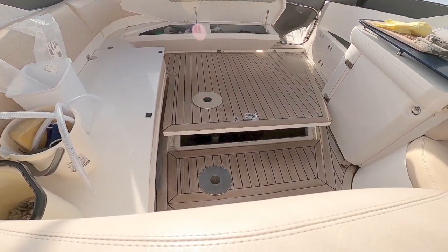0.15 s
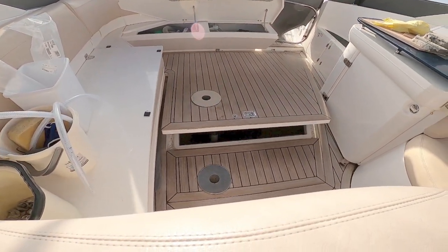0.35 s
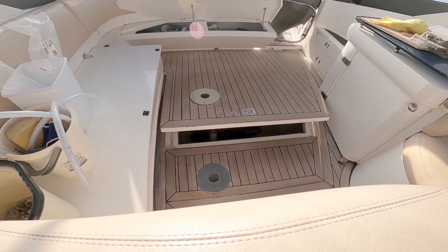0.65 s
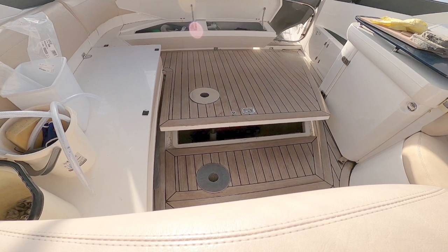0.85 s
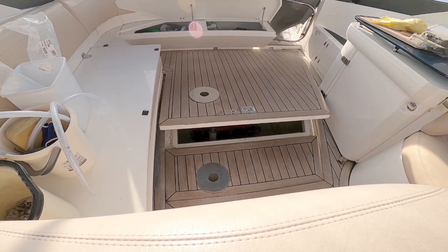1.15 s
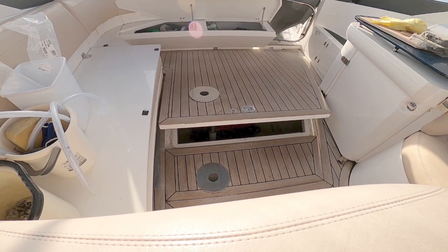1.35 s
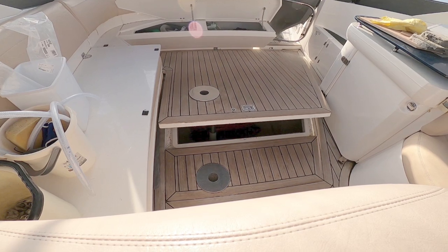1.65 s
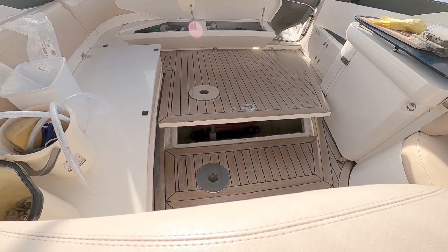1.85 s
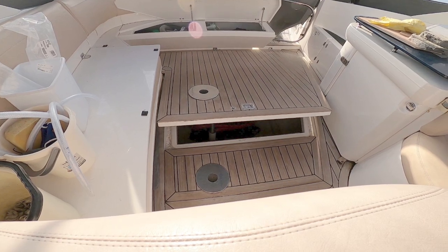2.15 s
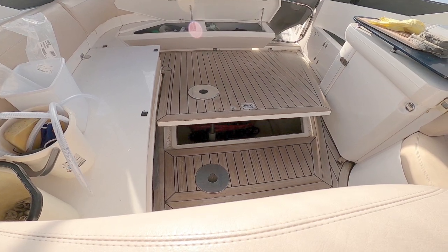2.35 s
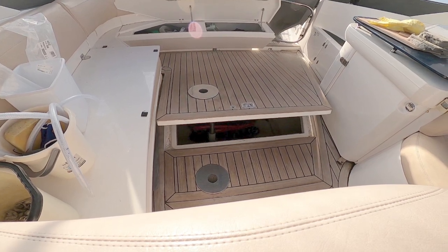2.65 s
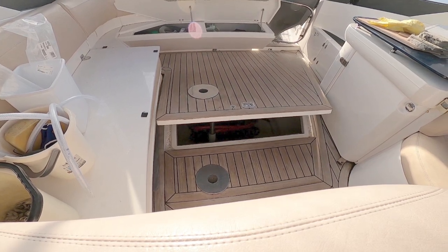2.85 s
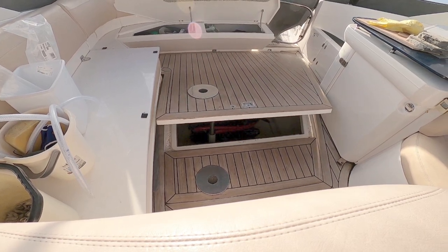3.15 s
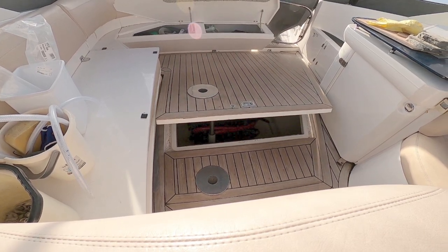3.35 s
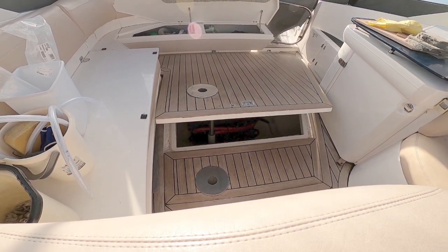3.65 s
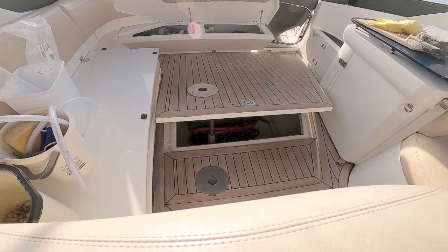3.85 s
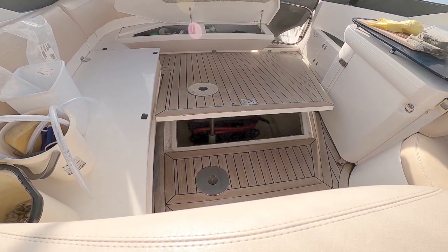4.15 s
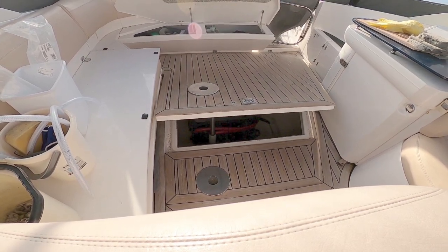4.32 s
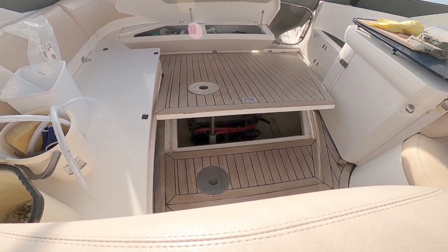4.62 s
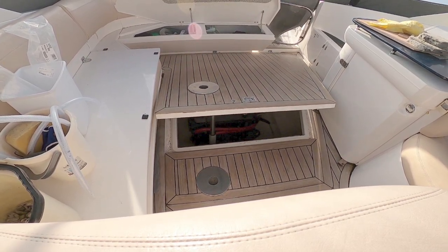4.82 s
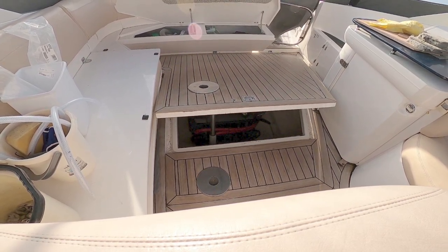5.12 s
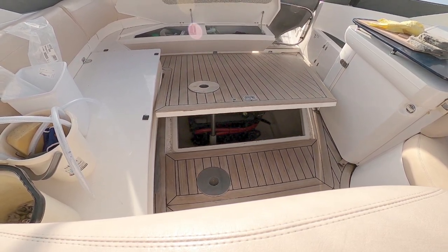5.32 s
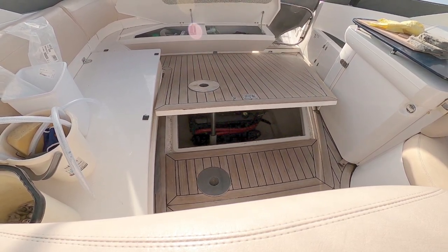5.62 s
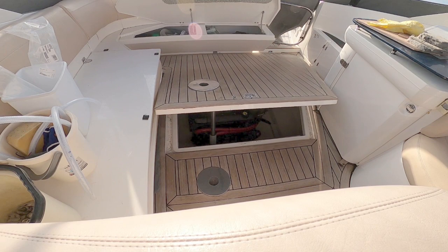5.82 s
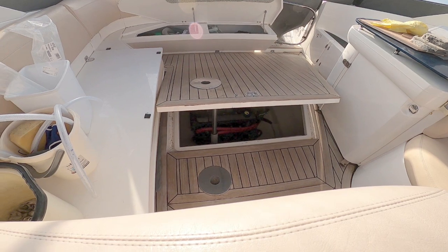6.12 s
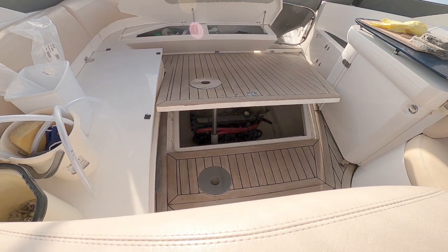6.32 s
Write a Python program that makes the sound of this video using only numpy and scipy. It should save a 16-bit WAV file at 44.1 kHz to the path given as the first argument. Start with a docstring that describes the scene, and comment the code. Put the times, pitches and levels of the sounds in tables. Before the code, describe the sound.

Heard close by in a boat's cockpit, a hatch lifting motor runs throughout with a low hum, a warbling gear whine and a fast repeating rasp, wavering gently under load. The barely open engine hatch drones at first, then the sound gradually turns brighter and hissier while the housing buzzes and chatters. An uneven harbour rumble sits behind it, with a brief dull shudder at the end.

```python
"""An electric ram slowly lifts a boat's engine hatch, heard from the cockpit seat over harbour rumble.
From the start its motor hums through the deck and drives a gear wheel at about 8 turns/s: teeth whine,
rough flanks rasp alike on every turn, the lifting screw loads and frees the drive in slow waves.
The barely open hatch drones until 1.5 s; by 3 s the housing's squeal has loosened into chatter.
Whine and hiss grow as the gap widens. Near 6 s the sizzle steps up; a soft low shudder comes last."""
import sys
import numpy as np
from scipy import signal
from scipy.fft import rfft, irfft, next_fast_len
from scipy.io import wavfile
from scipy.ndimage import map_coordinates

SR = 44100
rng = np.random.default_rng(int(sys.argv[2]) if len(sys.argv) > 2 else 0)


def generate_wav(signal):
    """Clip the signal to [-1, 1] and save it as 16-bit WAV at the path in sys.argv[1]."""
    frames = np.transpose(np.atleast_2d(signal))
    scaled = np.clip(frames, -1, 1) * 32767
    pcm = np.round(scaled).astype(np.int16)
    wavfile.write(sys.argv[1], SR, pcm)


N = 285768

# rumble spectrum: freq_hz, density_db
RUMBLE_COLOUR = [(10, -21.5), (24, -9), (38, -4.5), (51, 1), (64, -8), (85, -13), (120, -14), (170, -19.5),
                 (400, -38), (1500, -91)]
# rumble surges: centre_s, sigma_s, lift_db
RUMBLE_SURGES = [(.22, .14, 4), (1.912, 0.074, 5.5), (4.07, 0.065, 6), (4.6, 0.16, 4.5), (6.22, 0.09, 6)]
# low shudder: centre_s, sigma_s, level_db
SHUDDER_SWELL = (6.42, 0.057, -38.5)
# shudder spectrum: freq_hz, density_db
SHUDDER_SPECTRUM = [(30, -10), (80, 1), (180, -22), (270, -10.5), (350, -29), (900, -71)]
# mean wheel speed, falling under the hatch's weight: time_s, turns_per_s
WHEEL_SPEED = [(0, 8.228), (.7, 8.28), (1.7, 8.122), (3.5, 8.118), (4.3, 8.07), (5, 8.105), (5.8, 8.065),
               (6.48, 8.098)]
# overtones singing at certain hatch angles: start_s, end_s, cycles_per_turn, level_db, swing_cycles
SINGING_TONES = [(0, 1.52, 179, -58, 0.42), (0, 3.1, 214, -60.5, 0.25), (0, 3.7, 127, -59, .05),
                 (1.6, 4.3, 156, -59.5, 1.26), (2.6, 3.3, 840, -76, .35), (2.699, 4.8, 512, -59, .43),
                 (3.6, 7, 121, -60, 0.091), (4, 4.9, 177, -58, 0.49), (4.5, 6.6, 155, -56, .36),
                 (4.6, 5, 840, -72, 0.29), (5, 7.4, 366, -63, 1.0)]
# low pulsing at the tight spot: time_s, level_db
RUB_LEVEL = [(0, -58.5), (1.9, -52), (3.6, -53), (5, -56), (6.48, -55)]
# housing buzz: time_s, level_db
BUZZ_LEVEL = [(0, -47.5), (.35, -53.5), (.75, -53), (1.25, -62), (3.45, -52), (4.4, -58.5), (6.48, -51)]
# resonances and hollows of ram and hatch: centre_hz, width_hz, lift_db
PANEL_MODES = [(415.3, 21.7, 14), (415, 30, -1.5), (512, 64, 7), (833, 71, -6.5), (1033, 84, 2.5),
               (1290, 98, 4.5), (1430, 46, 2.5), (3000, 86, 2), (3420, 47, -6.5), (3963, 205, 3.5),
               (4170, 220, 5), (4880, 140, 3.5), (6120, 180, 3.5), (7670, 190, 3)]
# gear noise spectrum, body: freq_hz, density_db
CASING_COLOUR = [(100, -27), (170, -5), (280, 3), (350, -3.5), (620, -2.5), (930, -1), (1600, -2),
                 (2500, -4.5), (3300, -4), (3800, -13.5), (5000, -39), (7000, -80.5)]
# gear noise spectrum, treble: freq_hz, density_db
HISS_COLOUR = [(1500, -57.5), (2800, -14.5), (3600, -0.5), (4200, -2.5), (4900, -5), (5250, -15.5),
               (6200, -18), (6600, -25), (7900, -26), (8600, -34), (9700, -36.5), (11000, -49),
               (12700, -49.5), (13700, -55)]
# gear noise spectrum, top: freq_hz, density_db
SIZZLE_SPECTRUM = [(4000, -32), (7000, -1), (9500, -1.5), (11000, -7.5), (12700, -9.5), (13700, -16.5)]
# mesh overtones: tooth_rate_multiple, relative_db
WHINE_OVERTONES = [(2, -25), (3, -20), (4, -20), (5, -20), (6, -14), (8, -5), (10, -16), (12, -26.5),
                   (14, -35), (16, -37)]
# motor hum in the deck: time_s, level_db
HUM_LEVEL = [(0.0, -35), (0.07, -33.5), (0.23, -38), (1.99, -33), (5.2, -35), (6.3, -36.5), (6.48, -37.5)]
# drone of the barely open hatch, letting go: time_s, level_db
DRONE_LEVEL = [(0, -45), (.85, -44.5), (1.1, -50.5), (1.5, -50), (1.7, -66), (2.5, -59), (6.48, -67)]

TEETH, MOTOR_RATIO, BUZZ_ORDER, RUB_ORDER, GROAN_ORDER = 60, 16, 246, 30, 92  # cycles per wheel turn
SCREW_PERIOD_S, FIRST_PUSH_S = .688, .377
PUSH_SAG_TURNS_PER_S, PUSH_HUM_DB, PUSH_MESH_DB = .065, .45, 2.5
MESH_DB, MESH_RISE_DB = -51.5, 4
WHINE_DB, WHINE_RISE_DB = -44.5, 4.5
BODY_DB, BODY_RISE_DB = -46, 1.5
HISS_DB, HISS_RISE_DB = -48, 2.5
SIZZLE_DB, SIZZLE_RISE_DB, SIZZLE_STEP_S, SIZZLE_STEP_DB = -85.5, 6.5, 5.9, 4.5
GROAN_MIN_DB, GROAN_MIN_S, GROAN_CURVE_DB = -62, 3.6, 7
CHATTER_TIGHT_CYCLES, CHATTER_LOOSE_CYCLES, LOOSEN_S = .11, .25, 2.9
RUMBLE_DB, RUMBLE_SWING_DB = -45, 1.5
TOP_HZ = 13700
TIME_S = np.arange(N) / SR


def amp(db):
    """Decibels to gain."""
    return 10 ** (np.asarray(db) / 20)


def unit(x):
    """Scale to rms 1."""
    return x / np.sqrt(np.mean(x ** 2) + 1e-20)


def along(points, hz):
    """Interpolate (freq_hz, value) points on a log axis."""
    freq_hz, values = np.transpose(points)
    return np.interp(np.log(hz + 1), np.log(freq_hz + 1), values)


def curve(points):
    """Interpolate (time_s, value) points at every sample."""
    return np.interp(TIME_S, *np.transpose(points))


def wobble(rate_hz):
    """Smooth random curve with knots at rate_hz."""
    knots = rng.standard_normal(int(N * rate_hz / SR) + 4)
    return map_coordinates(knots, [TIME_S * rate_hz])


def swell(centre_s, sigma_s):
    """Gaussian bump of height 1."""
    return np.exp(-.5 * ((TIME_S - centre_s) / sigma_s) ** 2)


def filtered(x, response):
    """Apply the gain response(hz)."""
    size = next_fast_len(N + SR // 2)
    return irfft(rfft(x, size) * response(np.fft.rfftfreq(size, 1 / SR)), size)[:N]


def noise(colour):
    """Coloured noise, rms 1."""
    return unit(filtered(rng.standard_normal(N), lambda hz: amp(along(colour, hz))))


def tone(cycles):
    """Sine with random start phase, rms 1."""
    return np.sqrt(2) * np.sin(2 * np.pi * (cycles + rng.random()))


def per_turn(turn, ripples):
    """Random profile that repeats every wheel turn, rms 1."""
    size = 16 * ripples
    harmonics = np.exp(2j * np.pi * rng.random(ripples))
    profile = irfft(np.append(0, harmonics), size)
    return unit(np.interp(turn % 1, np.arange(size + 1) / size, np.append(profile, profile[0])))


def spot(turn, at_turns, sigma_turns):
    """Gaussian bump once a turn."""
    return np.exp(-.5 * (((turn - at_turns + .5) % 1 - .5) / sigma_turns) ** 2)


def opening_db(halfway_db, rise_db):
    """Level climbing by rise_db over the lift as the gap widens."""
    return halfway_db + rise_db * np.linspace(-.5, .5, N)


def screw_load():
    """Lifting screw load: 1 at the hardest push, -1 running free."""
    return np.cos(2 * np.pi * (TIME_S - FIRST_PUSH_S) / SCREW_PERIOD_S)


def engine_bay(x, wet, t60_s=.17):
    """Bay and panels ring briefly; gliding tones flicker across the dense modes."""
    t = np.arange(SR // 4) / SR
    tail = rng.standard_normal(len(t)) * amp(-60 * t / t60_s)
    return unit(x + wet * signal.fftconvolve(x, tail / np.linalg.norm(tail))[:N])


def radiated(x, colour):
    """Apply a smooth colour and the resonances of ram and hatch; rms 1."""
    def response(hz):
        panels_db = sum(lift_db / (1 + (2 * (hz - centre_hz) / width_hz) ** 4)
                        for centre_hz, width_hz, lift_db in PANEL_MODES)
        return amp(along(colour, hz) + panels_db)
    return unit(filtered(x, response))


def harbour(hum_hz=50.2):
    """Uneven low rumble and faint machine hum around the boat."""
    surge_db = sum(lift_db * swell(centre_s, sigma_s) for centre_s, sigma_s, lift_db in RUMBLE_SURGES)
    rumble = amp(RUMBLE_DB + RUMBLE_SWING_DB * wobble(6) + surge_db) * noise(RUMBLE_COLOUR)
    hum = amp(-59.5) * tone(hum_hz * TIME_S + .22 * wobble(7.2))
    octave = amp(-48.5 + 2.9 * wobble(2.32)) * tone(2 * hum_hz * TIME_S + .044 * wobble(6.5))
    return rumble + hum + octave


def shudder():
    """Brief dull swell of low noise."""
    centre_s, sigma_s, level_db = SHUDDER_SWELL
    return amp(level_db) * swell(centre_s, sigma_s) * noise(SHUDDER_SPECTRUM)


def singing(turn):
    """Single wheel overtones swell and fade as the hatch tilts, warbling once a turn."""
    out = np.zeros(N)
    for start_s, end_s, order, level_db, swing_cycles in SINGING_TONES:
        fade = np.interp(TIME_S, [start_s - .15, start_s + .16, end_s - .1, end_s + .11], [0, 1, 1, 0])
        cycles = order * (turn + .0004 * wobble(30))
        warble_cycles = swing_cycles * np.sin(2 * np.pi * (turn - .6))
        flicker_db = 1.4 * per_turn(turn, ripples=8) + 1.5 * wobble(24)
        out += amp(level_db) * fade * unit(amp(flicker_db) * tone(cycles + warble_cycles))
    return out


def tight_spot(turn):
    """The wheel binds once a turn, more lightly opposite: low pulsing with sagging pitch, and a groan."""
    press = spot(turn, .9, .09) + .42 * spot(turn, .46, .045) + .35 * spot(turn, .71, .04)
    sag_cycles = .12 * np.cos(2 * np.pi * (turn - .82))
    rub_db = curve(RUB_LEVEL) + .85 * wobble(9.3)
    rub = unit(press * tone(RUB_ORDER * turn + sag_cycles + .058 * wobble(24)))
    catch = spot(turn, .93, .065) + .7 * spot(turn, .74, .05)
    groan_db = GROAN_MIN_DB + GROAN_CURVE_DB * (TIME_S / GROAN_MIN_S - 1) ** 2
    groan = unit(catch * tone(GROAN_ORDER * turn + .096 * wobble(45)))
    return amp(rub_db) * rub + amp(groan_db) * groan


def housing_buzz(turn):
    """The gear housing squeals in stutters, then breaks into chatter."""
    chatter_cycles = np.interp(TIME_S, [0, LOOSEN_S], [CHATTER_TIGHT_CYCLES, CHATTER_LOOSE_CYCLES])
    stutter_db = 2 * wobble(110) + 2.7 * np.cos(2 * np.pi * MOTOR_RATIO / 4 * turn)
    squeal = tone(BUZZ_ORDER * turn + chatter_cycles * wobble(150))
    return amp(curve(BUZZ_LEVEL)) * unit(amp(stutter_db) * squeal)


def flanks(turn, fresh_share):
    """Sliding tooth flanks: the same roughness each turn, plus fresh noise."""
    repeating = np.sqrt(1 - fresh_share) * per_turn(turn, ripples=2600)
    return repeating + np.sqrt(fresh_share) * rng.standard_normal(N)


def flank_rasp(turn):
    """Flank roughness rings the casing, hardest at the tight spot and twice per rotor turn."""
    load_db = (1.3 + wobble(6)) * spot(turn, at_turns=.74, sigma_turns=.16)
    load_db += 2.76 * np.cos(2 * np.pi * 2 * MOTOR_RATIO * turn)
    body = engine_bay(amp(load_db) * flanks(turn, fresh_share=.34), wet=.35)
    hiss = engine_bay(amp(.58 * load_db) * flanks(turn, fresh_share=.72), wet=.93)
    sizzle = flanks(turn, fresh_share=.72)
    step_db = np.interp(TIME_S, [SIZZLE_STEP_S - .1, SIZZLE_STEP_S + .1], [0, SIZZLE_STEP_DB])
    return (amp(opening_db(BODY_DB, BODY_RISE_DB)) * radiated(body, CASING_COLOUR)
            + amp(opening_db(HISS_DB, HISS_RISE_DB)) * radiated(hiss, HISS_COLOUR)
            + amp(opening_db(SIZZLE_DB, SIZZLE_RISE_DB) + step_db) * radiated(sizzle, SIZZLE_SPECTRUM))


def tooth_mesh(turn):
    """Teeth meet at a clean pitch; spacing errors and chatter roughen the overtones into a whine."""
    tooth_cycles = TEETH * turn
    note_db = opening_db(MESH_DB, MESH_RISE_DB) + PUSH_MESH_DB * screw_load()
    dip = 1 - .71 * spot(turn, at_turns=.16, sigma_turns=.086)
    note = unit(dip * tone(tooth_cycles + .019 * per_turn(turn, ripples=6)))
    # the eccentric wheel hurries and lags, bending overtones into chirps
    lag_cycles = .025 * np.sin(2 * np.pi * turn) + .018 * wobble(20)
    whine = np.zeros(N)
    for multiple, relative_db in WHINE_OVERTONES:
        error_cycles = lag_cycles + .0085 * per_turn(turn, ripples=6) + .011 * wobble(60)
        stutter_db = 1.2 * wobble(22) + 1.8 * np.cos(2 * np.pi * MOTOR_RATIO / 4 * turn)
        overtone = amp(stutter_db + 3.04 * wobble(90)) * tone(multiple * (tooth_cycles + error_cycles))
        whine += amp(relative_db) * engine_bay(overtone, wet=.33)
    return amp(note_db) * note + amp(opening_db(WHINE_DB, WHINE_RISE_DB)) * whine


def motor(turn):
    """Rotor unbalance hums, throbbing with the wheel; its third harmonic sets the hatch droning."""
    rotor_cycles = MOTOR_RATIO * turn
    throb_db = .65 * np.cos(2 * np.pi * (turn - .94))
    hum_db = curve(HUM_LEVEL) + PUSH_HUM_DB * screw_load() + throb_db + .23 * wobble(25)
    hum = tone(rotor_cycles + .0021 * np.sin(2 * np.pi * turn))
    dip = 1 - .64 * spot(turn, at_turns=.62, sigma_turns=.13)
    drone = unit(dip * tone(3 * rotor_cycles + .036 * wobble(20)))
    return amp(hum_db) * hum + amp(curve(DRONE_LEVEL)) * drone


def scene():
    """The whole drive follows the wheel angle; the wheel slows at each push of the screw."""
    turn = np.cumsum(curve(WHEEL_SPEED) - PUSH_SAG_TURNS_PER_S * screw_load()) / SR
    ram = (motor(turn) + tight_spot(turn) + tooth_mesh(turn)
           + singing(turn) + flank_rasp(turn) + housing_buzz(turn))
    return (ram + harbour() + shudder())[None]


def record(dry):
    """Brick-wall low-pass at TOP_HZ."""
    return filtered(dry[0], lambda hz: hz < TOP_HZ)[None]


dry = scene()
out = record(dry)
generate_wav(out)
```